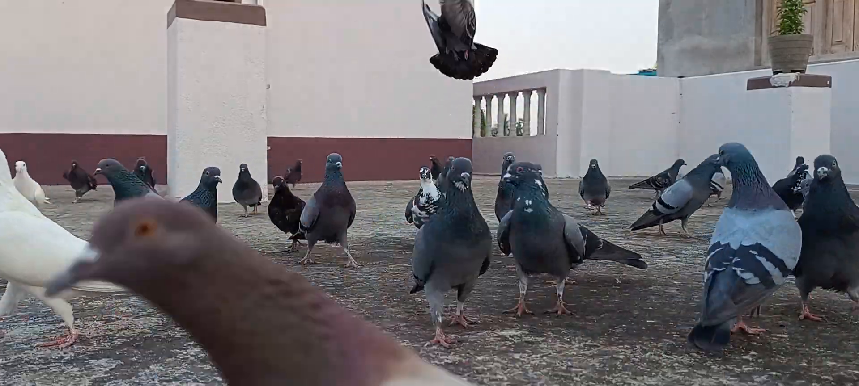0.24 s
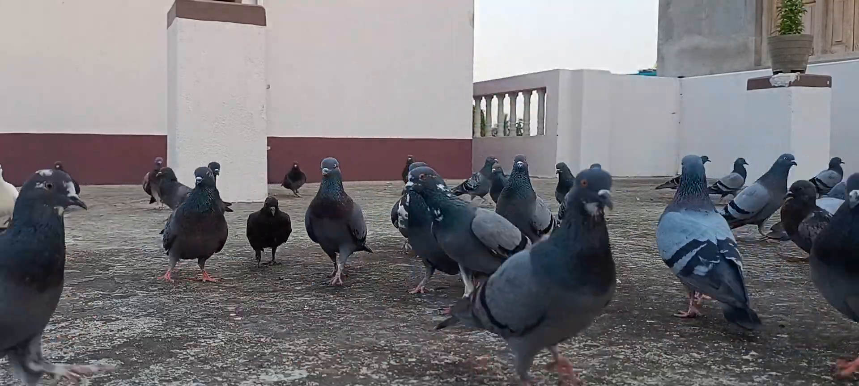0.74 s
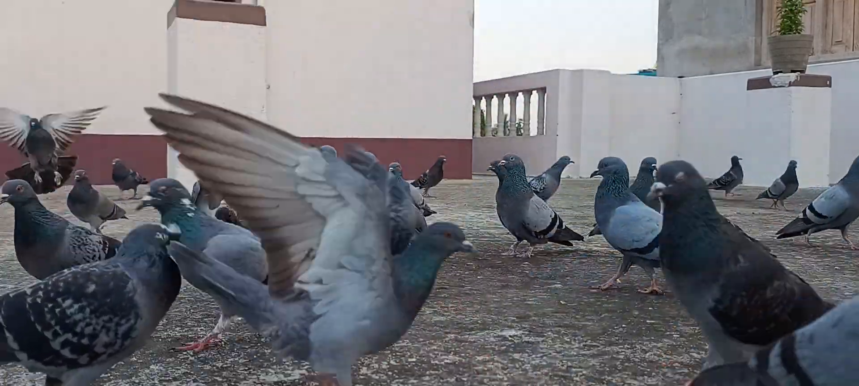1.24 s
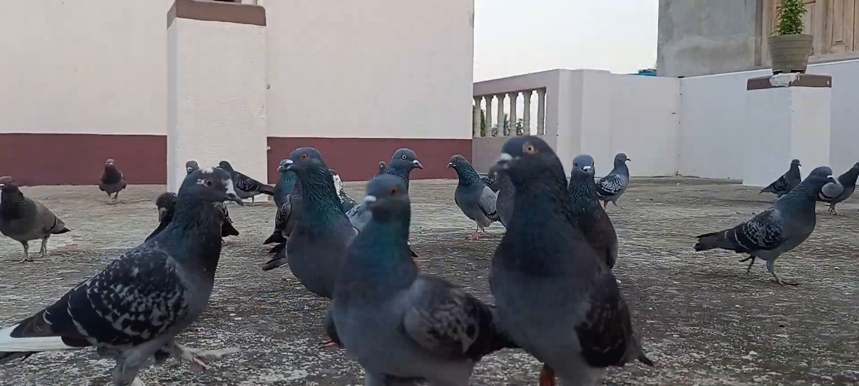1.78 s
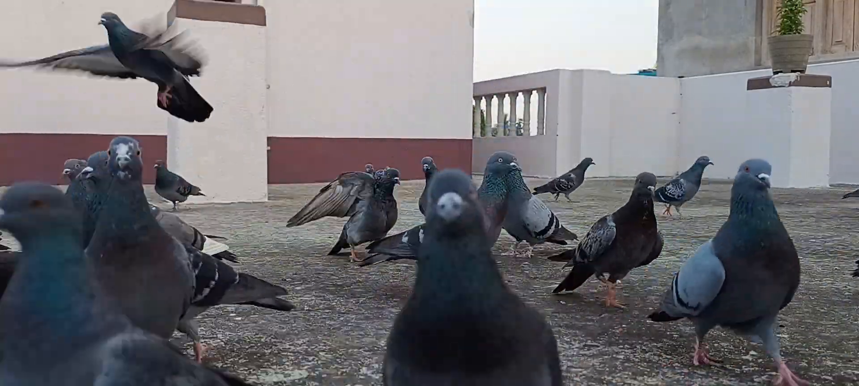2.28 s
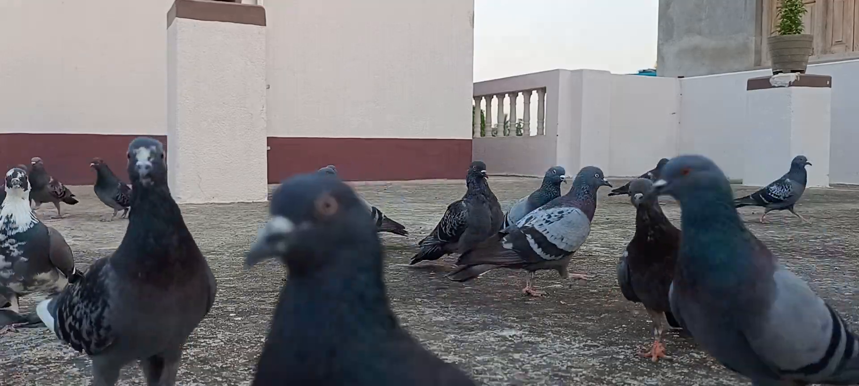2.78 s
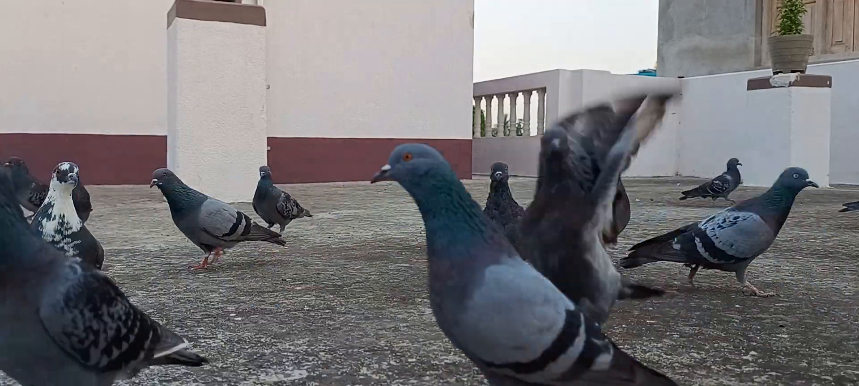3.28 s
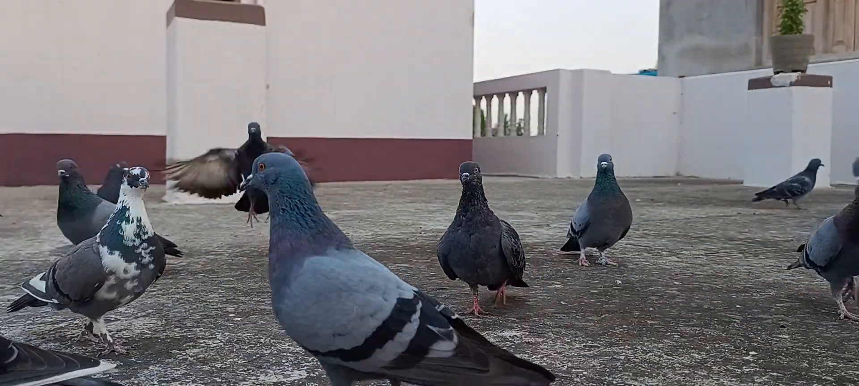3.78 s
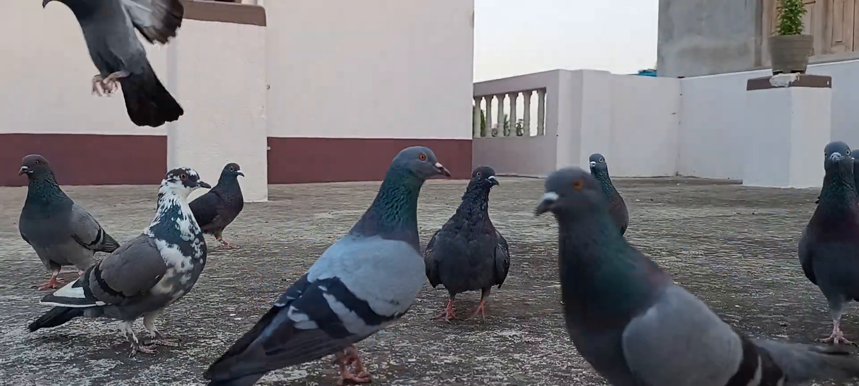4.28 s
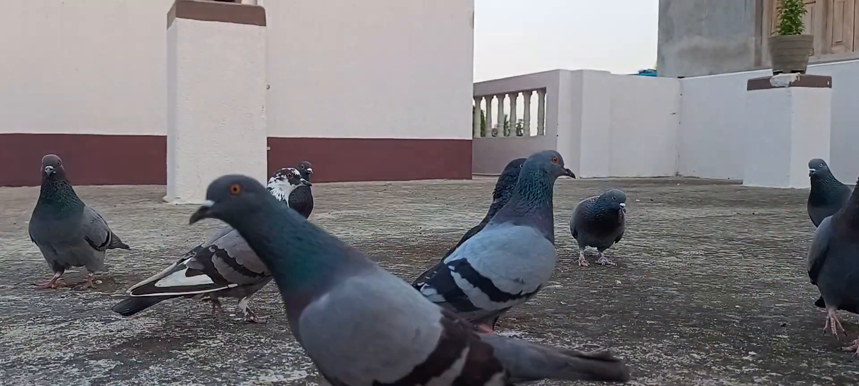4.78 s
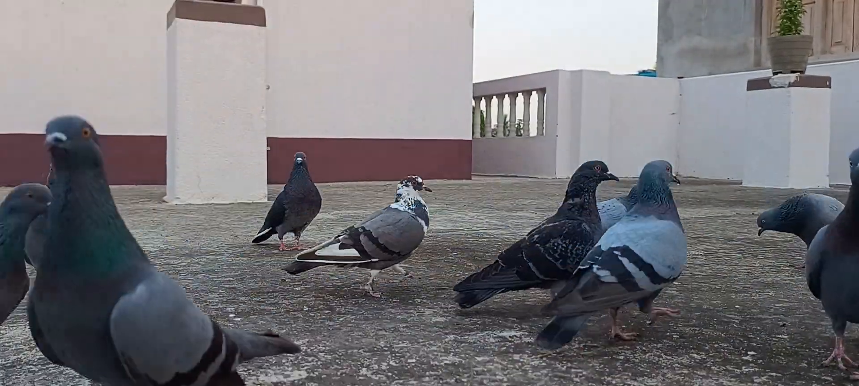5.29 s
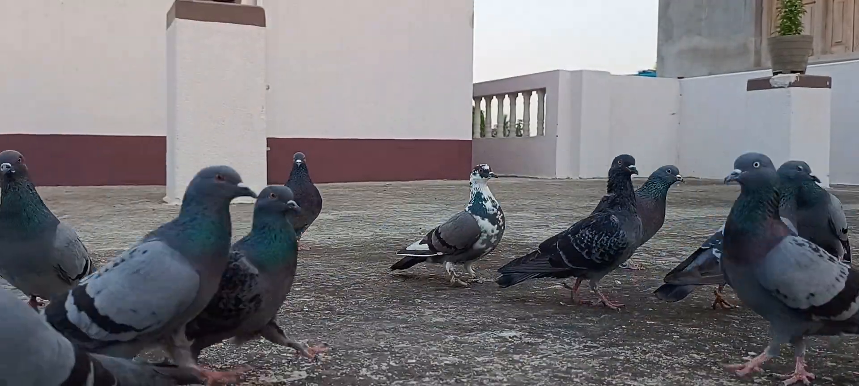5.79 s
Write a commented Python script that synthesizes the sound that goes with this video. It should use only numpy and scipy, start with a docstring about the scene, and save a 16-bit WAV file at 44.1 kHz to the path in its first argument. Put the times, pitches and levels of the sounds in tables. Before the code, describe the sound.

Very quiet at first: feathers brushing, light hops, two soft landing thuds and an occasional far cheep echoing between walls. Past the middle a wing claps once and whistling strokes follow, with thin trills overhead. Then hard wingbeats blast air onto the close ground-level microphone in two low, bumpy flurries, the first strongest, as the twittering peaks. Afterwards trills thin out over the faint town hum, and a last wing brushes past.

```python
"""Pigeons crowd a walled rooftop around a small microphone on the ground: grainy noise for feathers, with swells
and puffs of air as birds hop and stroke their wings. Soft landings are brief low swings, one wing clap is a
cluster of ringing tones, and flurries of downwash buffet the port as bursts of low noise with sharp kinks.
Small birds twitter overhead in gliding sines, wings whistle in partials, another bird cheeps far off between
walls, and the town is a low humming noise."""
import sys
import numpy as np
from scipy import signal
from scipy.fft import rfft, irfft, next_fast_len
from scipy.io import wavfile
from scipy.ndimage import uniform_filter1d, map_coordinates

SR = 44100
rng = np.random.default_rng(int(sys.argv[2]) if len(sys.argv) > 2 else 0)


def to_wav(s):
    """Save 16-bit WAV."""
    ch = np.atleast_2d(s).T  # columns
    pcm = np.round(np.clip(ch, -1, 1) * 32767)  # PCM
    wavfile.write(sys.argv[1], SR, pcm.astype(np.int16))


def amplitude_ratio(level_db):
    """Convert a level in decibels to the matching linear amplitude (field) ratio."""
    exponent = np.asarray(level_db, float) / 20
    return 10 ** exponent


N = 266055  # samples


def unit(x):
    """x brought to rms 1."""
    return x / np.sqrt(np.mean(x ** 2) + 1e-20)


def along(points, hz):
    """(Hz, value) points read off on a log frequency axis."""
    f, v = np.transpose(points)
    return np.interp(np.log(hz + 1), np.log(f + 1), v)


def wobble(rate):
    """A smooth random curve, rate knots a second."""
    knots = rng.standard_normal(int(N * rate / SR) + 4)
    return map_coordinates(knots, [np.arange(N) * rate / SR])


def coloured(x, spectrum):
    """x through a (Hz, dB) spectrum, brought to rms 1."""
    m = next_fast_len(len(x) + 8192)
    gain = amplitude_ratio(along(spectrum, np.fft.rfftfreq(m, 1 / SR)))
    return unit(irfft(rfft(x, m) * gain, m)[:len(x)])


def patchy(patchy_db):
    """White noise with patches of random gain in time and frequency."""
    z = signal.stft(rng.standard_normal(N + 512), nperseg=512)[2]
    field = uniform_filter1d(rng.standard_normal(z.shape), 8, 0)
    field = uniform_filter1d(field, 6, 1)
    return signal.istft(z * amplitude_ratio(patchy_db * unit(field)), nperseg=512)[1][:N]


def add(out, s, x):
    """Mix x into out from time s."""
    part = out[max(round(s * SR), 0):][:len(x)]
    part += x[:len(part)]


def swells(rows):
    """Bell-shaped gains from rows of (s at peak, dB, length s), summed as powers."""
    t = np.arange(N) / SR
    return np.sqrt(sum(amplitude_ratio(db) ** 2 * np.exp(-2 * ((t - s) / length) ** 2) for s, db, length in rows))


def tone(s, hz, db, waver, flicker_db=0):
    """A sine through (s, Hz, dB) points with soft ends, an unsteady pitch and a flickering level."""
    t = np.arange(s[0], s[-1], 1 / SR)
    drift = uniform_filter1d(rng.standard_normal(len(t)), 90) * 9
    flicker = uniform_filter1d(rng.standard_normal(len(t)), 300)
    flicker = unit(uniform_filter1d(flicker, 300))
    edge = np.clip(np.minimum(t - s[0], s[-1] - t) / 0.008, 0, 1)  # 8 ms fades
    phase = 2 * np.pi * np.cumsum(np.interp(t, s, hz) * (1 + waver * drift)) / SR
    size = amplitude_ratio(np.interp(t, s, db) + flicker_db * flicker) * np.sin(np.pi / 2 * edge) ** 2
    return np.sqrt(2) * size * np.sin(phase + rng.uniform(0, 2 * np.pi))


def notes(rows, waver, flicker_db=0):
    """Gliding notes from rows of (s, length s, start Hz, end Hz, dB), with a little room for their fades."""
    out = np.zeros(N)
    for s, length, hz0, hz1, db in rows:
        span = [s - .003, s + length + 0.0027]
        add(out, s - .003, tone(span, [hz0, hz1], [db, db], waver, flicker_db))
    return out


def walls(x, gap_s, lumpy_db=0):
    """The walls answer after a gap; each frequency dies at its own speed; far walls return separate lumps."""
    # reverberation between the walls: f/Hz, time to fall 60 dB/s
    wall_decay = [(300, 0.18), (3500, 0.43), (9000, 0.51)]
    hz, t, z = signal.stft(rng.standard_normal(SR // 2), SR, nperseg=256)
    lumps = lumpy_db * rng.standard_normal(len(t))
    t60 = np.maximum(along(wall_decay, hz), .05)[:, None]
    tail = signal.istft(z * amplitude_ratio(lumps - 60 * t / t60), SR, nperseg=256)[1]
    late = np.pad(x, (round(gap_s * SR), 0))
    return signal.fftconvolve(late, tail / np.linalg.norm(tail))[:len(x)]


def town():
    """Patchy far noise and a low band of hum that swells and fades."""
    # far town noise: f/Hz, relative level/dB per Hz
    town_spectrum = [(20, -5), (60, -2.5), (140, 2.5), (302, -5), (481, -14), (1550, -15.5), (5010, -19.5),
                     (6010, -22), (7500, -27.5), (9750, -63.5), (16500, -120)]
    # band of the hum: f/Hz, relative level/dB per Hz
    hum_spectrum = [(40, -44), (70, -5), (110, 0), (135, 12), (165, 1.5), (230, -47)]
    # swells of the hum: t/s at peak, level/dB, length/s
    hum_swells = [(.1, -72, 0.34), (.6, -74.5, .25), (1.01, -66, 0.046), (1.2, -62, .1),
                  (1.66, -64.5, 0.077), (2.33, -61.5, 0.13), (2.8, -62.5, 0.28), (3.13, -61.5, 0.11),
                  (3.7, -63, .4), (4.25, -52, 0.11), (4.9, -57.5, 0.67), (5.53, -56.5, 0.039),
                  (5.83, -60.5, .07), (6.03, -60, .04)]
    town_db, hum_rest_db = -71, -82.5
    hum = coloured(rng.standard_normal(N), hum_spectrum) * amplitude_ratio(2.4 * wobble(42))
    hum = np.hypot(amplitude_ratio(hum_rest_db), swells(hum_swells)) * unit(hum)
    return hum + amplitude_ratio(town_db) * coloured(patchy(patchy_db=3.5), town_spectrum)


def flock():
    """Feathers rub in clumped grains; each stroke is a quick swell of the same rustle with a puff of air."""
    # shuffling all around the microphone: t/s, rustle level/dB
    shuffling = [(0, -72.5), (.5, -74.5), (1, -72.5), (1.4, -76), (2.1, -78.5), (2.45, -69.5), (2.9, -74),
                 (3.3, -77.5), (3.6, -75), (4.1, -71.5), (4.5, -62), (4.8, -73.5), (5.13, -63),
                 (5.4, -75.5), (5.9, -74.5)]
    # rustle through the port: f/Hz, relative level/dB per Hz
    feather_spectrum = [(530, -30), (900, -12.5), (1190, -2.5), (1320, -10), (1830, -5), (3170, -6.5),
                        (5910, -3.5), (7980, -20.5), (9660, -6.5), (12900, -22), (15000, -11.5),
                        (15800, -13)]
    # air moved by wings: f/Hz, relative level/dB per Hz
    air_spectrum = [(120, -12), (220, -4.5), (400, -3), (700, -5.5), (1100, -13), (2500, -18),
                    (4500, -17.5), (7000, -43)]
    # birds hop or beat nearby, a soft swell of rustle: t/s at peak, level/dB, length/s
    swishes = [(.62, -72.5, 0.054), (1.17, -67, 0.12), (1.55, -76, 0.048), (1.88, -72, 0.13),
               (2.27, -65.5, 0.025), (2.36, -68.5, 0.02), (2.56, -64, 0.043), (2.82, -73.5, .05),
               (3.45, -59, 0.061), (3.58, -63, 0.064), (3.71, -66.5, 0.049), (3.85, -68, .05),
               (3.99, -68, 0.038), (4.165, -55.5, 0.024), (4.25, -66.5, .04), (4.85, -64.5, .03),
               (6.02, -53.5, 0.042)]
    # single wing strokes and claw scrapes: t/s, level/dB ahead of the onset and the rustle's share,
    # time to fall 60 dB/s, air re that level/dB
    stroke_rows = [(0.099, -66.5, 0.074, 6.5), (1.158, -56.5, 0.024, 6), (1.195, -59.5, 0.029, 6),
                   (1.299, -60.5, 0.064, -2.5), (2.1428, -52, 0.027, -8), (2.2622, -56.5, 0.047, 4),
                   (2.506, -56.5, 0.068, -4), (2.6514, -63, 0.052, 4.5), (2.822, -55, 0.046, -13),
                   (2.954, -50.5, 0.037, 0), (3.0801, -56.5, 0.029, 8.5), (3.424, -60.5, 0.04, -6),
                   (3.4476, -61, 0.036, 0), (3.4636, -42, 0.043, -6), (3.5852, -48, 0.018, -1.5),
                   (4.1471, -47.5, 0.041, 8), (4.232, -56.5, 0.16, 3), (4.2667, -44, 0.023, 1),
                   (4.8387, -59.5, 0.092, 11.5), (5.008, -59, 0.16, 6.5), (5.113, -54, 0.095, 11.5),
                   (5.9801, -39, 0.03, -22)]
    flutter_db, flutter_grows = -71, 0.94  # air at mean shuffling; its swing in dB over that of the rustle
    swish_air_db, stroke_rustle_db = -2, -2.5  # air re the swish; rustle re the stroke

    shuffle_s, shuffle_db = np.transpose(shuffling)
    shuffle_db = np.interp(np.arange(N) / SR, shuffle_s, shuffle_db)
    swish = swells(swishes)
    strokes, puffs, t = np.zeros(N), np.zeros(N), np.arange(SR // 4) / SR
    for s, db, decay, air_db in stroke_rows:
        swell = amplitude_ratio(db - 60 * t / max(decay, .005)) * (1 - np.exp(-t / 0.0012))
        add(strokes, s, swell)
        add(puffs, s, amplitude_ratio(air_db) * swell)

    grains = patchy(patchy_db=1.5) * amplitude_ratio(2.43 * wobble(60) + 2.0 * wobble(300))
    grains *= 1 + 1.48 * np.clip(wobble(120) - 1.3, 0, .8)  # separate feather ticks stand out
    rustle_gain = np.hypot(amplitude_ratio(shuffle_db + 2.1 * wobble(14)), swish)
    rustle_gain = np.hypot(rustle_gain, amplitude_ratio(stroke_rustle_db) * strokes)
    rustle = coloured(grains, feather_spectrum) * rustle_gain

    air = coloured(patchy(patchy_db=2.2), air_spectrum) * amplitude_ratio(1.5 * wobble(25))
    flutter = amplitude_ratio(flutter_db + flutter_grows * (shuffle_db - shuffle_db.mean()))
    air_gain = np.hypot(np.hypot(flutter, amplitude_ratio(swish_air_db) * swish), puffs)
    return rustle + air * air_gain


def far_bird():
    """One rough two-part cheep in two voices, repeated; flat far walls and a lumpy tail send it back."""
    # calls of the far bird: t/s, level/dB added to the call, opening note re the slur/dB
    calls = [(.15, 0, -1), (1.458, -2.5, 4.5), (3.13, -7.5, 11), (5.59, -3, -2)]
    # opening note: t/s in the call, f/Hz, level/dB before the call's own level and distance
    opening_note = [(0, 5300, -60.5), (.018, 4780, -55.5)]
    # falling slur: t/s in the call, f/Hz, level/dB before the call's own level and distance
    falling_slur = [(.012, 3820, -62), (.045, 3710, -52.5), (.07, 3460, -58.5), (.11, 3000, -63.5)]
    # flat far walls return the cheep whole: delay/s, level re the direct cheep/dB
    echoes = [(.03, -3.5), (.087, -11.5), (.12, -15.5), (.145, -15.5)]
    undertone, undertone_db = .84, -16  # second voice: pitch over the first, level re the first
    out = np.zeros(N)
    for start, level_db, opening_db in calls:
        call = np.zeros(SR)
        for part, part_db in ((opening_note, opening_db), (falling_slur, 0)):
            s, hz, db = np.transpose(part)
            for ratio, voice_db in ((1, 0), (undertone, undertone_db)):
                voice = tone(s, ratio * hz, db + level_db + part_db + voice_db, waver=.04, flicker_db=2.5)
                add(call, s[0], voice)
        for delay, echo_db in [(0, 0)] + echoes:
            add(out, start + delay, amplitude_ratio(echo_db - 6) * call)
        add(out, start, amplitude_ratio(-5) * walls(call, 0, lumpy_db=6))
    return out


def wing_whistles():
    """Air through the primaries sings a short stack of partials, among hoots, peeps and brief whistles."""
    # hoots, peeps and brief whistles, faint to fairly loud: t/s, length/s, start f/Hz, end f/Hz, level/dB
    hoots = [(.6, 0.084, 888, 826, -71), (2.05, 0.14, 770, 756, -74.5), (2.83, 0.069, 767, 810, -75),
             (3.02, 0.096, 799, 830, -68.5), (3.16, .1, 798, 790, -73), (3.43, 0.027, 603, 584, -60.5),
             (3.56, 0.099, 801, 800, -68.5), (3.89, 0.2, 800, 780, -70.5), (5.72, .1, 2216, 2220, -76.5),
             (5.21, .08, 3200, 2800, -68.5), (2.245, .03, 640, 520, -71), (2.32, .035, 480, 480, -71),
             (2.6, 0.057, 670, 620, -70.5), (2.47, .04, 480, 450, -74), (2.3, .03, 670, 700, -70),
             (2.59, .035, 620, 590, -74), (2.685, .04, 615, 610, -73), (5.64, 0.0607, 2600, 2600, -72.5),
             (5.53, 0.092, 3650, 3550, -70.5), (5.79, 0.034, 2620, 2600, -76),
             (3.7, 0.098, 3500, 3650, -77), (2.11, 0.081, 2070, 1900, -75.5),
             (2.21, 0.053, 2100, 2200, -74), (3.465, 0.048, 623, 570, -55.5), (4.24, 0.016, 333, 305, -46),
             (4.19, 0.024, 720, 740, -55)]
    # flight feathers whistle once a downstroke: t/s, start f/Hz, end f/Hz, level/dB, change per partial/dB
    downstrokes = [(3.557, 628, 582, -65, -2), (3.69, 600, 528, -68.5, -3), (3.843, 564, 647, -63.5, -3.5),
                   (3.982, 620, 602, -67.5, 0), (4.7, 624, 592, -71, 3.5), (4.832, 578, 654, -66.5, 1),
                   (4.961, 578, 625, -55, -8.5), (5.45, 600, 565, -82.5, 4.5)]
    downstroke_s = .03
    out = notes(hoots, waver=0.036, flicker_db=2)
    for s, hz0, hz1, db, step_db in downstrokes:
        partials = [(s, downstroke_s, k * hz0, k * hz1, db + step_db * (k - 1)) for k in (1, 2, 3)]
        out += notes(partials, waver=0.06, flicker_db=2)
    return out + amplitude_ratio(-13) * walls(out, 0.008)


def thuds():
    """A bird drops onto the concrete: a brief low swing under a bell."""
    # soft landings: t/s at peak, rms level at peak/dB, f/Hz, length/s
    landings = [(1.685, -52, 96, 0.0077), (2.553, -50, 70, 0.011)]
    out, t = np.zeros(N), np.arange(-SR // 20, SR // 20) / SR
    for s, db, hz, length in landings:
        swing = np.exp(-(t / length) ** 2) * np.cos(2 * np.pi * hz * t)
        add(out, s + t[0], np.sqrt(2) * amplitude_ratio(db) * swing)
    return out


def clap():
    """Wing tips meet: a crack that rings the port in dying tones, then the walls."""
    # ringing of the port: f/Hz, level ahead of the soft onset/dB, time to fall 60 dB/s
    ring_modes = [(2540, -22, 0.0054), (5900, -27.5, 0.0075), (11460, -30, 0.0042), (14900, -37.5, 0.0075),
                  (9360, -45, 0.017), (163, -45, 0.054)]
    clap_s = 3.4042
    t, out = np.arange(SR // 10) / SR, np.zeros(N)
    ring = np.zeros(len(t))
    for hz, db, t60 in ring_modes:
        ring += amplitude_ratio(db - 60 * t / t60) * np.sin(2 * np.pi * hz * t + rng.uniform(0, 2 * np.pi))
    add(out, clap_s, ring * (1 - np.exp(-(t / 0.00019) ** 2)))
    return out + amplitude_ratio(-15.5) * walls(out, 0.0033)


def trill(first, last, gap, hz, db):
    """Rows (s, length, Hz, dB) of one run: even gaps, sinking pitch, a swell, every note a little different."""
    longest_s, sag_per_s, swell_db = .012, .2, 2.5  # the middle is swell_db louder than the ends
    s = np.arange(first, last + gap / 2, gap)
    place = (s - (first + last) / 2) / (last - first)
    high, loud = rng.standard_normal((len(s), 2)).T
    pitch = hz * (1 - sag_per_s * place * (last - first) + .015 * high)
    level_db = db - 4 * swell_db * place ** 2 + 1.5 * loud
    return np.transpose([s, min(longest_s, .6 * gap) + 0 * s, pitch, level_db])


def small_birds():
    """Gliding sines overhead: trills, peeps, arches, whistles; a farther bird chimes in by each trill note or peep."""
    # trills, runs of short falling notes: first t/s, last t/s, gap/s, middle f/Hz, level/dB
    runs = [(3.422, 3.57, 0.023, 6000, -63.5), (3.745, 4.1, .04, 4900, -64.5),
            (3.987, 4.3, 0.022, 5300, -63.5), (4.126, 4.235, 0.035, 5120, -58),
            (4.352, 4.52, 0.032, 5280, -56), (4.604, 4.74, 0.016, 5850, -58.5),
            (4.691, 4.915, 0.031, 5600, -51.5), (4.945, 5.07, 0.026, 5260, -51.5),
            (4.714, 4.9, .026, 7700, -75.5), (5.112, 5.23, 0.021, 5250, -62), (5.3, 5.9, .024, 4750, -68.5),
            (4.705, 4.83, 0.034, 5350, -58.5), (4.795, 4.93, .03, 6500, -64.5),
            (4.85, 4.96, .027, 7700, -79), (3.56, 3.76, .065, 6400, -75)]
    # peeps and stray trill notes, loud and soft: t/s, length/s, middle f/Hz, level/dB
    peeps = [(3.484, .0066, 4630, -59.5), (4.01, 0.0073, 5170, -57.5), (4.171, 0.015, 5090, -56),
             (4.478, 0.012, 5240, -49.5), (4.545, .007, 6010, -51.5), (4.567, .011, 6300, -55),
             (4.586, 0.0096, 4940, -50.5), (4.632, .01, 5500, -51), (4.691, 0.008, 6160, -49.5),
             (4.703, 0.013, 5390, -50.5), (4.809, .022, 5450, -55.5), (5.112, 0.0081, 5000, -49),
             (5.513, .018, 6310, -65.5), (5.531, 0.0084, 5480, -49), (5.552, 0.0086, 5950, -55),
             (5.592, 0.017, 5530, -52), (5.657, 0.0081, 5280, -54), (5.702, 0.0139, 5110, -55),
             (4.522, 0.021, 5150, -52)]
    # another bird's notes that rise and bend over: t/s, top f/Hz, level/dB
    arches = [(3.635, 5900, -66), (3.68, 5900, -72), (3.725, 6030, -65), (3.806, 5900, -66.5),
              (3.888, 5850, -66), (3.925, 5750, -74), (3.977, 5850, -70), (4.078, 5760, -67),
              (4.105, 5900, -67), (4.15, 5570, -59), (4.2, 5650, -65.5), (4.255, 5750, -57),
              (4.285, 5900, -65.5)]
    # longer whistles of the same birds, a list of points for each: t/s, f/Hz, level/dB
    whistles = [
        [(5.015, 5052, -63), (5.049, 6040, -59.5), (5.11, 6039, -60)],
        [(5.61, 5290, -59), (5.662, 5600, -55.5), (5.76, 4955, -93)],
    ]
    # thin high whistles and a few short, nearly level peeps: t/s, length/s, start f/Hz, end f/Hz, level/dB
    high_notes = [(5.341, 0.015, 5610, 5420, -55), (5.37, 0.013, 5530, 5480, -62),
                  (4.48, 0.1, 8680, 9720, -77), (4.51, 0.045, 7700, 7400, -72),
                  (5.28, 0.011, 7170, 7200, -69), (5.475, 0.084, 8600, 8900, -82)]
    arch_s, rise, droop = .03, .04, .08  # length; curvature of the pitch before and after the top

    s, length, hz, db = np.vstack([peeps] + [trill(*row) for row in runs]).T
    fall = .04 + 0.03 * np.clip((s - 4.1) / .5, 0, 1)  # the notes fall further as the birds grow excited
    near = np.transpose([s, length, hz * (1 + fall), hz * (1 - fall), db])
    late, shift = rng.uniform(-1, 1, (len(s), 2)).T
    far = near.copy()
    far[:, 2:4] *= 1 + 0.0703 * shift[:, None]
    far[:, 0] += .012 + 0.026 * late ** 2
    far[:, 4] -= 7
    out = notes(near, waver=.012, flicker_db=3.5) + notes(far, waver=0.026)
    out += notes(high_notes, waver=.003)

    place = np.linspace(0, 1, 9)  # along one arch
    bend = 1 - np.where(place < .4, rise, droop) * ((place - .4) / .55) ** 2
    for start, top_hz, level_db in arches:
        arch = tone(arch_s * place, top_hz * bend, level_db + 0 * place, waver=.008, flicker_db=0.5)
        add(out, start, arch)
    for rows in whistles:
        add(out, rows[0][0], tone(*np.transpose(rows), waver=0.012, flicker_db=2))
    return out + amplitude_ratio(-8) * walls(out, .008)


def downwash():
    """Big eddies swing the diaphragm slowly; at the height of a gust small, sharper ones break off."""
    # gusts on the port: t/s at peak, rms level at peak/dB, length/s, small sharp eddies re the gust/dB
    gusts = [(4.325, -29.5, 0.011, -32), (4.383, -19, 0.016, -15), (4.395, -19.5, 0.0076, -10),
             (4.422, -22, .019, -6), (4.436, -26.5, 0.021, 1), (4.455, -28.5, 0.023, -29),
             (4.48, -21, .017, -15), (4.498, -25.5, 0.01, -28), (4.52, -18.5, 0.012, -13),
             (4.536, -17.5, 0.0093, -4.5), (4.552, -21.5, 0.009, -5.5), (4.589, -20, 0.027, -3.5),
             (4.618, -23.5, 0.022, -11.5), (4.699, -36.5, 0.028, -26), (4.77, -25.5, .012, -22),
             (4.931, -35, 0.021, -40), (4.972, -31.5, 0.013, -30), (4.994, -24, .02, -40),
             (5.013, -24, 0.013, -32), (5.037, -21, 0.0078, -8.5), (5.078, -18, .013, -5.5),
             (5.117, -23, 0.012, -2.5), (5.131, -27, 0.018, -27), (5.179, -34, 0.018, -31),
             (5.219, -25, 0.013, -19), (5.234, -28, .012, -19), (5.254, -25, 0.012, -9.5),
             (5.302, -33, 0.013, -40)]
    # big eddies: f/Hz, relative level/dB per Hz
    big_eddies = [(30, -57), (55, -34.5), (80, -7), (130, 4), (200, -1.5), (320, -6.5), (550, -17.5),
                  (900, -34), (1500, -55.5), (2500, -120)]
    # small eddies: f/Hz, relative level/dB per Hz
    small_eddies = [(300, -1.5), (600, -0.5), (1000, -12), (1600, -25), (2500, -33.5), (4000, -63.5),
                    (6000, -120)]
    # restless air around and beneath the gusts: start t/s, end t/s, rms level of the big eddies at the middle/dB
    flurries = [(4.289, 4.656, -36.5), (4.727, 4.834, -41), (4.892, 5.357, -41.5)]
    restless_db, crackle_db = 4.5, -11.5  # how far that air lurches; its stray small eddies re the big ones

    out, t = np.zeros(N), np.arange(-SR // 10, SR // 10) / SR
    for s, db, length, sharp_db in gusts:
        layers = [(big_eddies, length, db), (small_eddies, 0.46 * length, db + sharp_db)]
        for spectrum, width, level_db in layers:
            bell = np.exp(-2 * (t / width) ** 2)
            eddies = bell * coloured(rng.standard_normal(len(t)), spectrum)
            add(out, s + t[0], amplitude_ratio(level_db) * eddies * np.linalg.norm(bell) / np.linalg.norm(eddies))

    now, stir = np.arange(N) / SR, np.zeros(N)
    for s0, s1, db in flurries:
        stir += amplitude_ratio(db) * np.sin(np.pi * np.clip((now - s0) / (s1 - s0), 0, 1)) ** .6
    crackle = unit(amplitude_ratio(6.5 * wobble(150))) * coloured(rng.standard_normal(N), small_eddies)
    lurching = unit(amplitude_ratio(restless_db * wobble(45))) * coloured(rng.standard_normal(N), big_eddies)
    return out + stir * (lurching + amplitude_ratio(crackle_db) * crackle)


def kinks():
    """One steep swing of the diaphragm and its rebound."""
    # whip-like kinks where the hardest gusts strike: t/s, peak level/dB, width/s
    kink_rows = [(4.48, -15.5, 0.00033), (4.5198, -14, 0.00028), (4.5894, -21.5, 0.00026),
                 (5.0365, -17.5, 0.00042), (5.0814, -13, 0.00016), (4.4204, -22.5, 0.00026),
                 (4.5587, -19.5, 0.00044), (5.2517, -22, 0.00044)]
    out, t = np.zeros(N), np.arange(-SR // 100, SR // 100) / SR
    for s, db, width in kink_rows:
        add(out, s + t[0], amplitude_ratio(db) * (1 - (t / width) ** 2) * np.exp(-(t / width) ** 2 / 2))
    return out


def scene():
    """Everything reaches one port on the ground."""
    air = downwash() + kinks() + thuds()
    return (flock() + clap() + air + small_birds() + far_bird() + wing_whistles() + town())[None]


def top_cut(x):
    """Nothing passes above the cut-off."""
    return signal.sosfilt(signal.butter(12, 16970, fs=SR, output="sos"), x)


def record(dry):
    """The microphone path cuts the deep bass (three 42 Hz slopes) and everything from 15850 Hz up."""
    hz = np.fft.rfftfreq(N + SR, 1 / SR)
    path = (1j * hz / (1j * hz + 42)) ** 3 * (hz < 15850)
    mix = irfft(rfft(dry, N + SR) * path, N + SR)[:, :N]
    return top_cut(mix)


dry = scene()
out = record(dry)
to_wav(out)
```